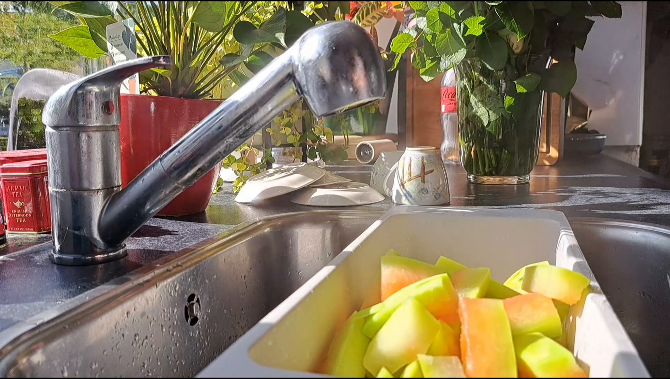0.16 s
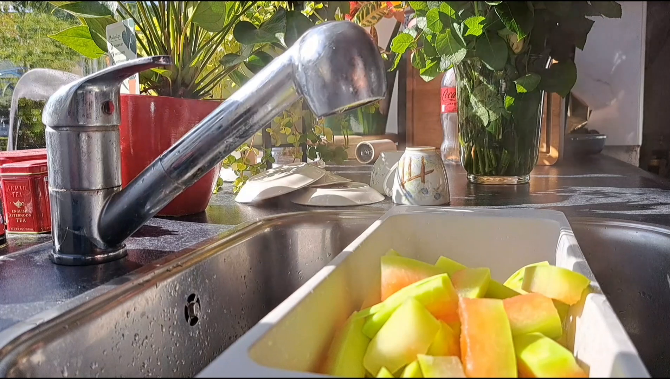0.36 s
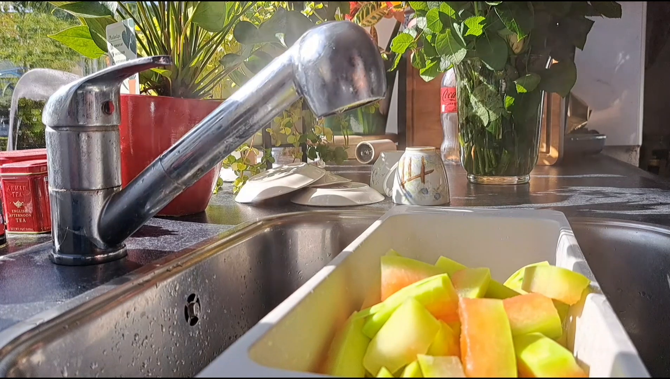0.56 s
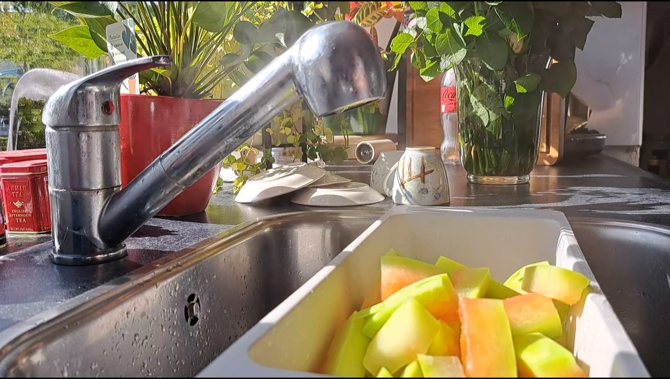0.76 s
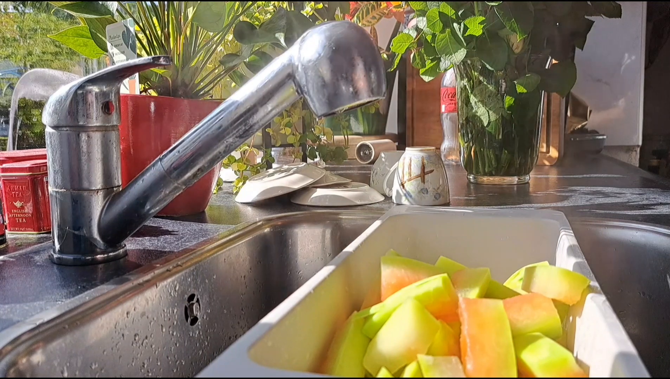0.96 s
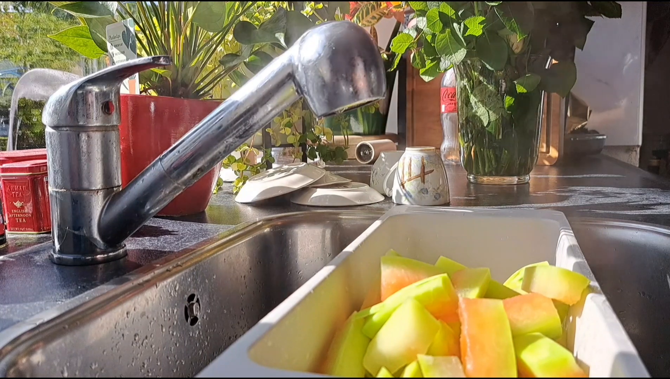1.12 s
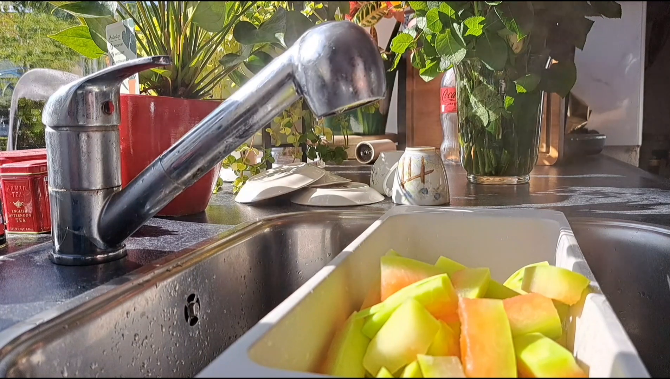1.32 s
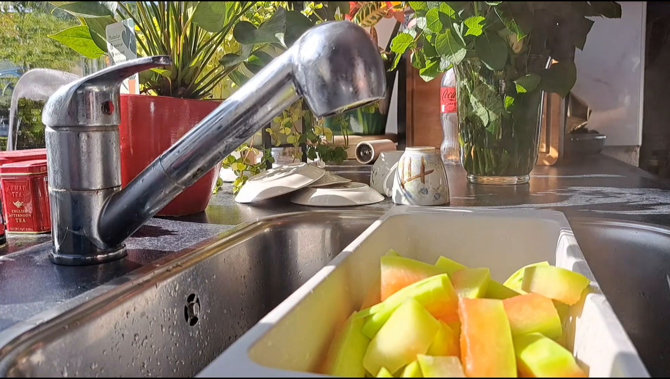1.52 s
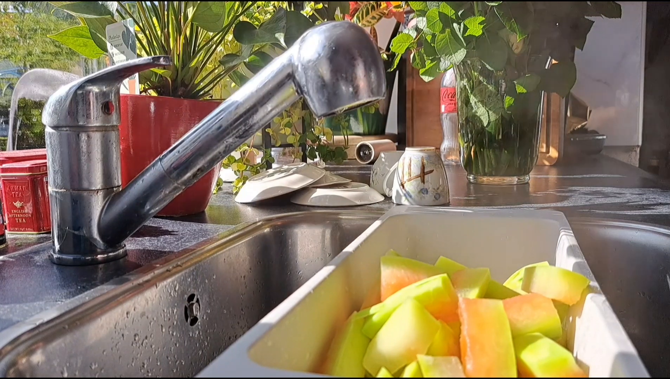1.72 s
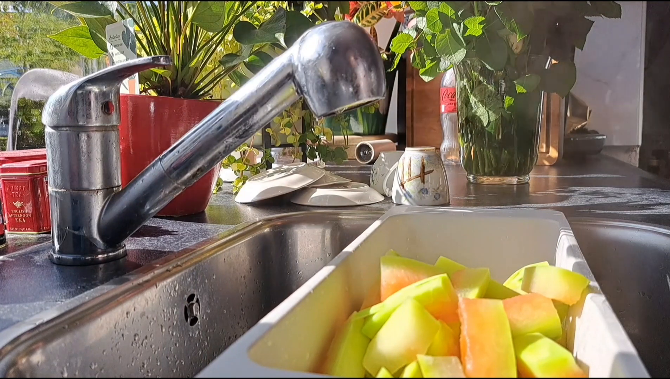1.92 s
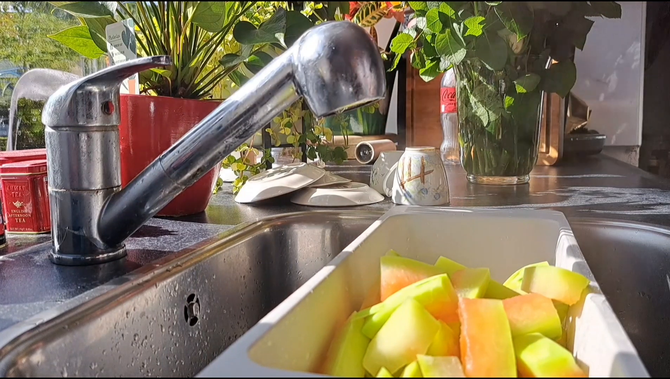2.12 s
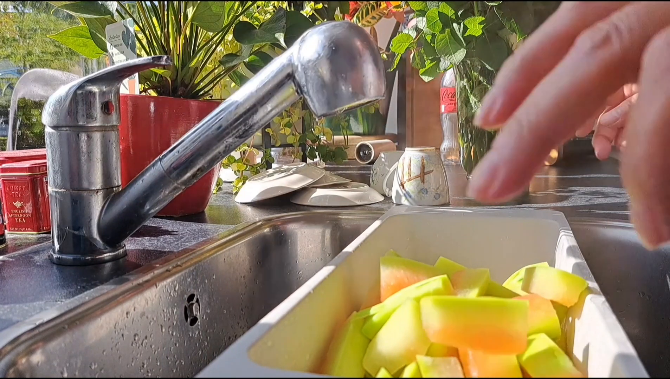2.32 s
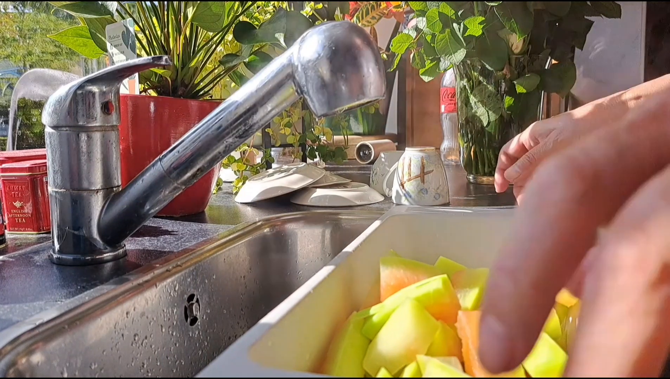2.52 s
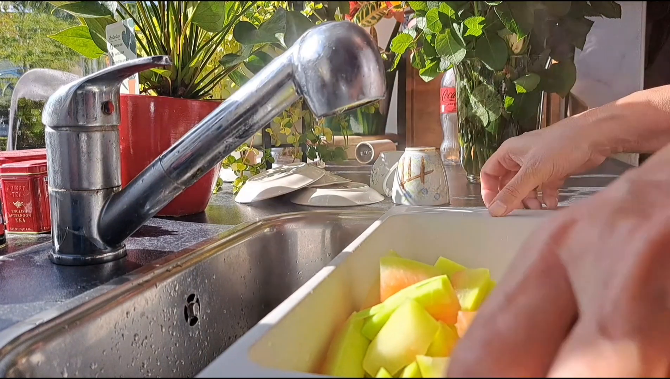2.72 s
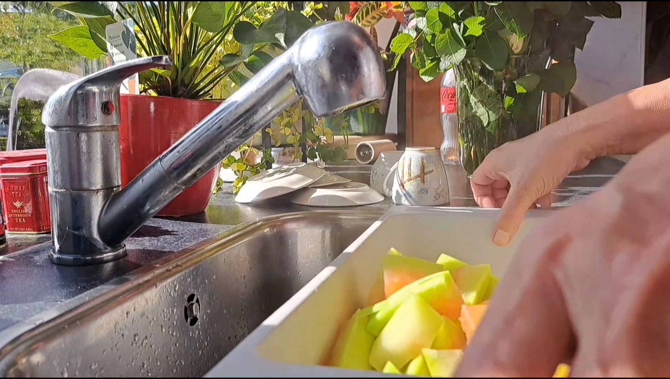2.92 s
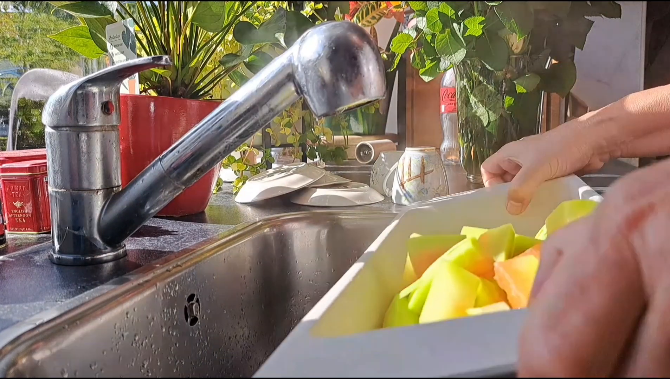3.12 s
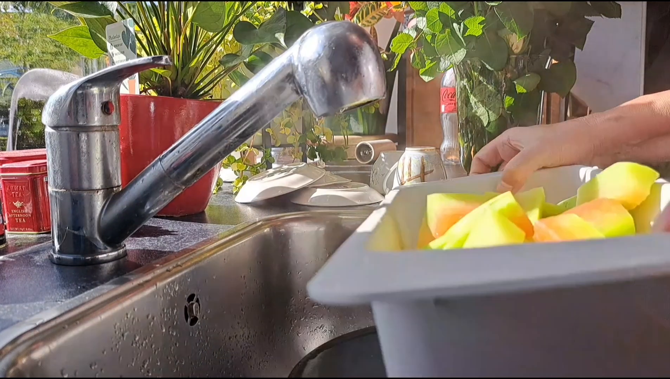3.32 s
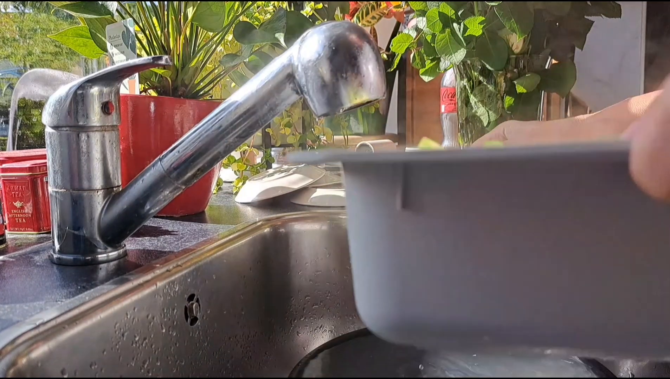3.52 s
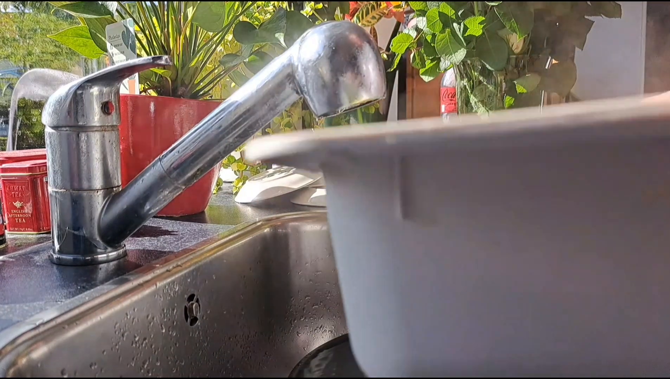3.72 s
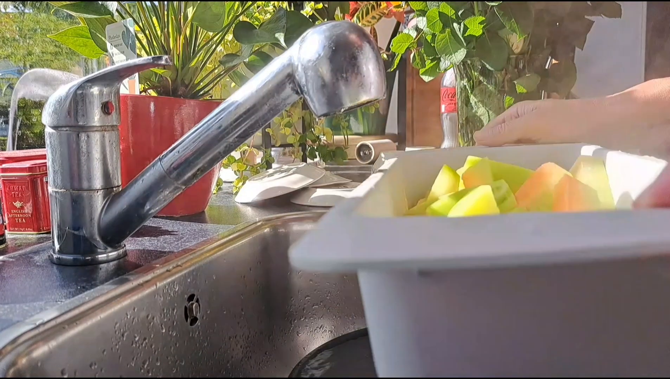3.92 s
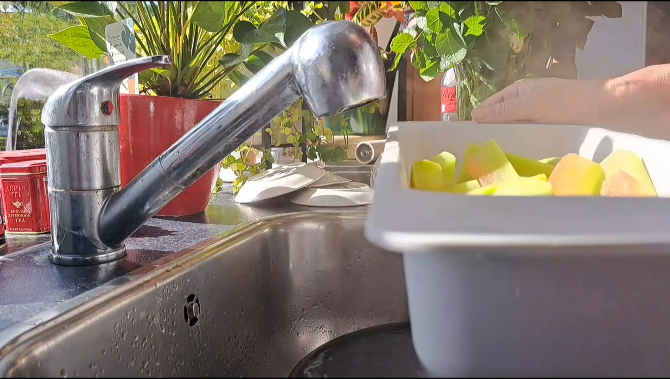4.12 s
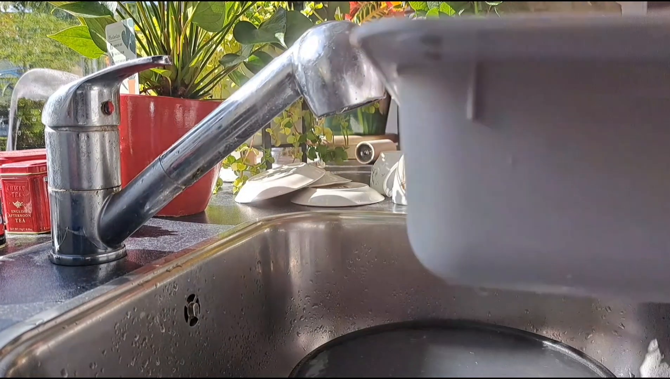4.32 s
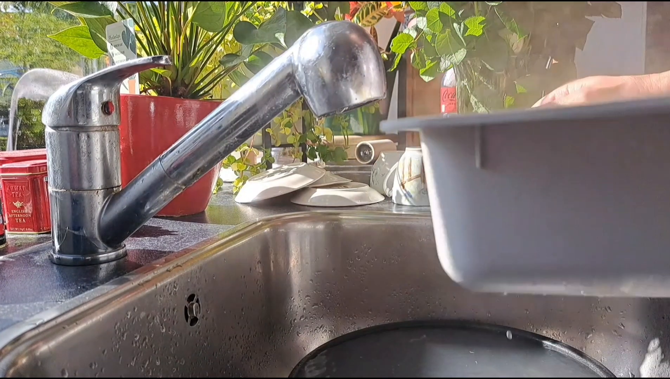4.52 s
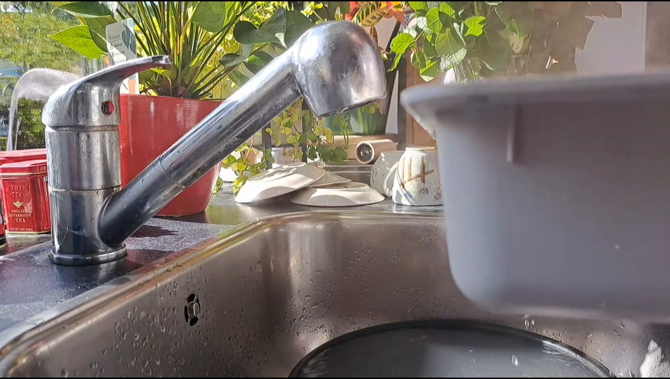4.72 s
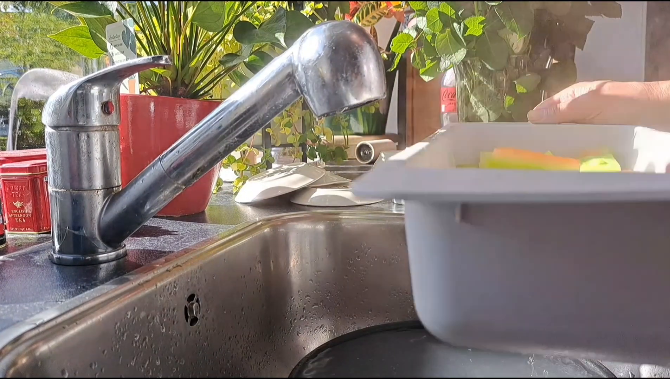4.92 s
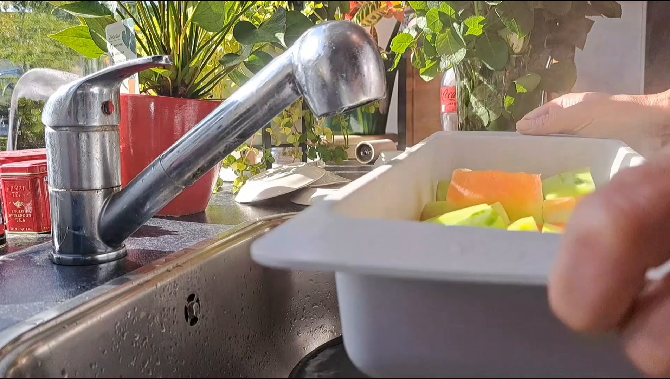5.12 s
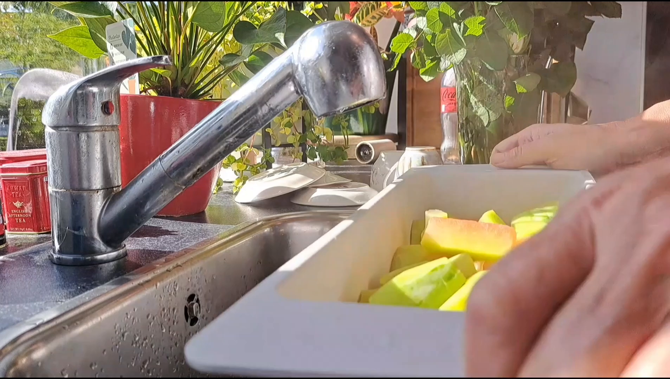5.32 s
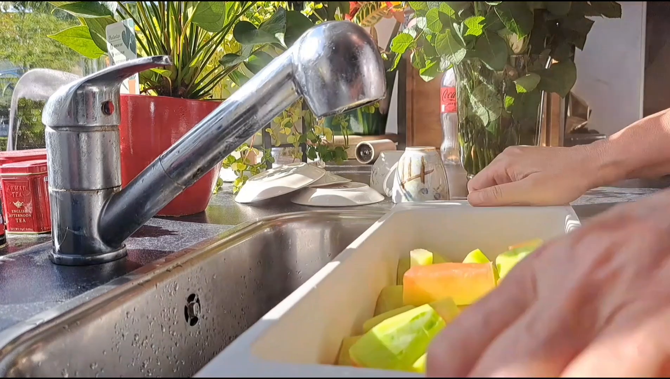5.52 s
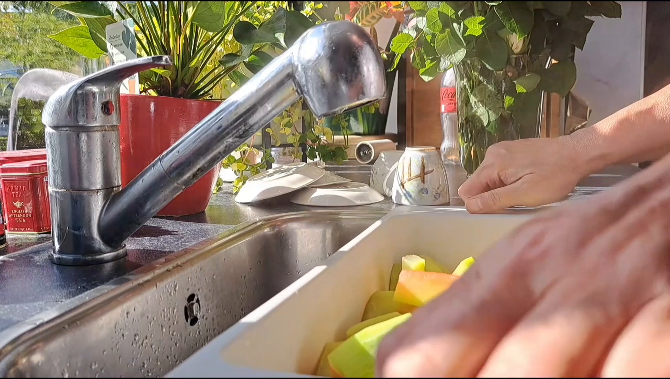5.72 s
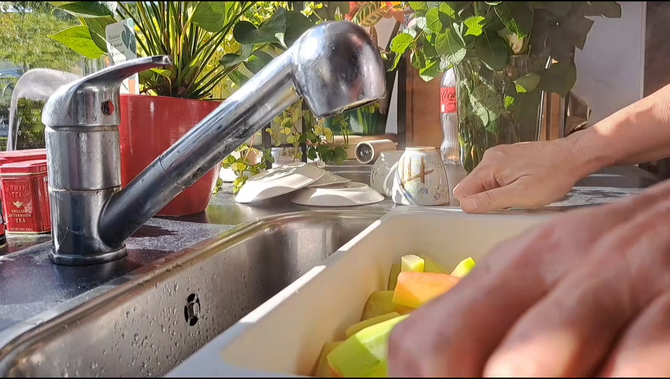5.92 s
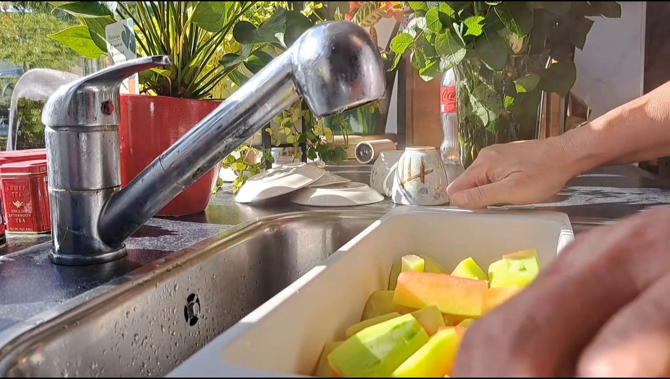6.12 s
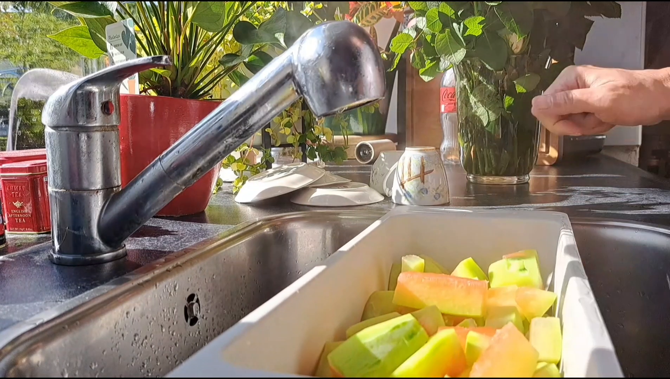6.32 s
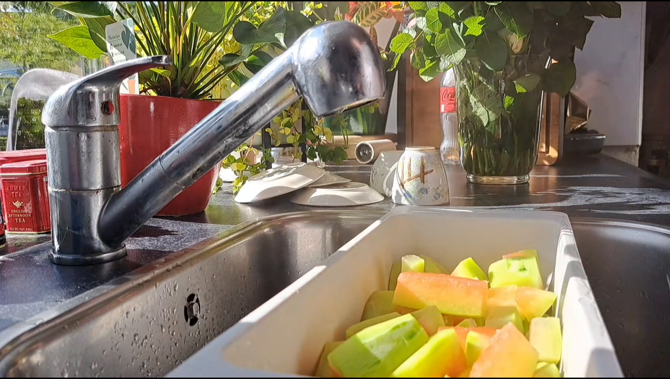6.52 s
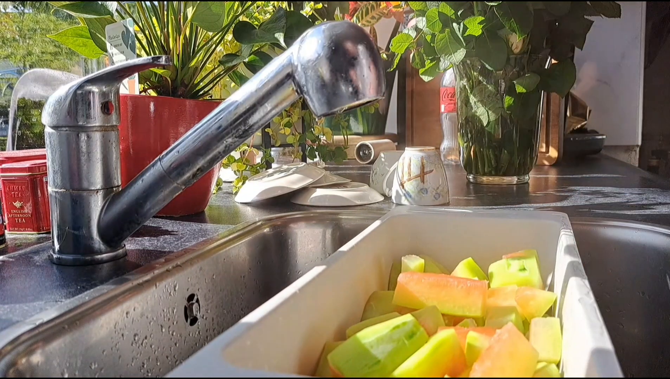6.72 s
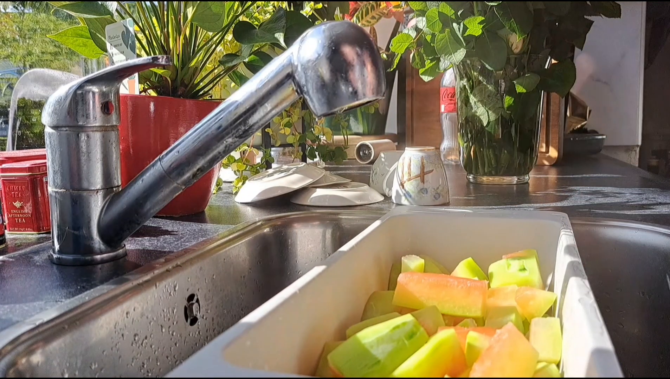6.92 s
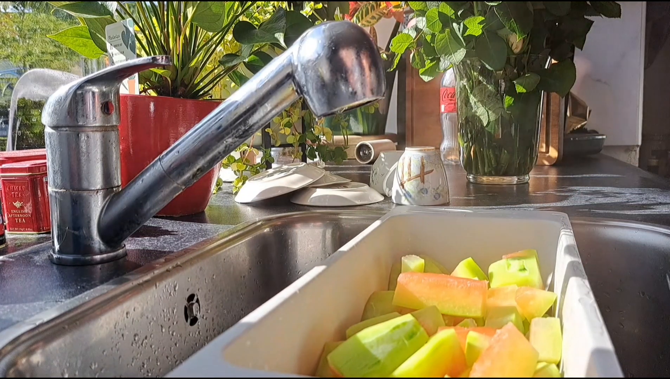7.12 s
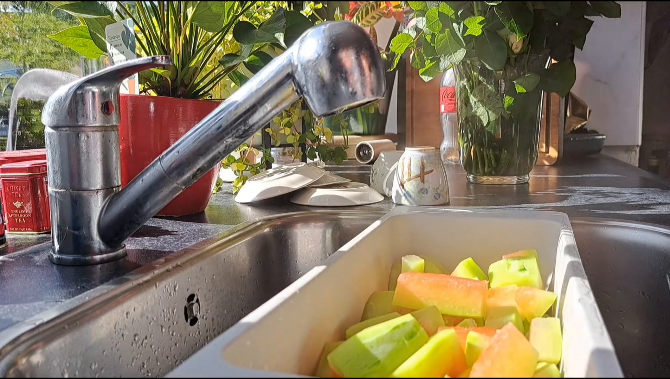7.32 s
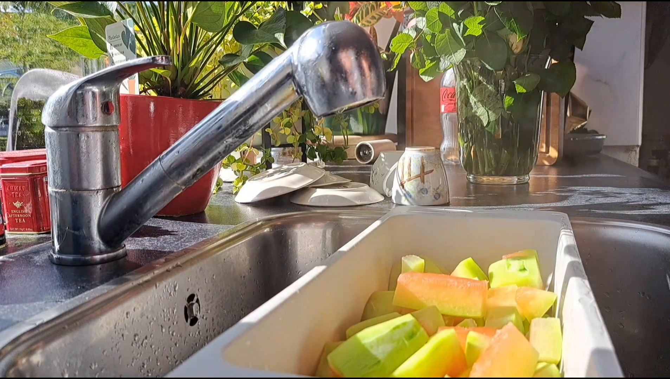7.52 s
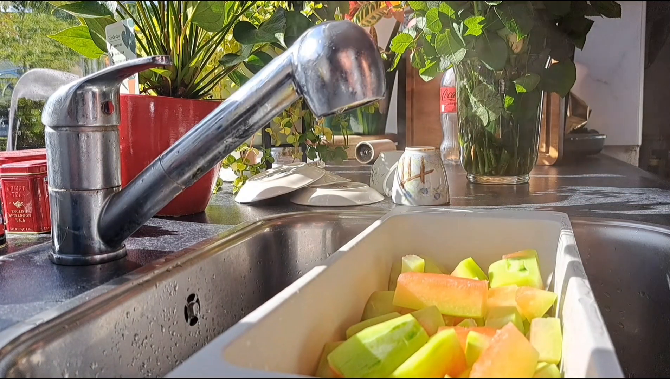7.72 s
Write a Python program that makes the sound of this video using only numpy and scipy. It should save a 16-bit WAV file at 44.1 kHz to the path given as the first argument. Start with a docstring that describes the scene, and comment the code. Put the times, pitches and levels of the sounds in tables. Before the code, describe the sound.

Close stereo pickup at a kitchen sink: soft fan hum first, with faint rubs and a distant dove. Small taps and a sharp click lead to a burst of dull, hollow plastic thuds as wet fruit is tossed in a tub, with scraping and rolling between blows. Lighter knocks follow, then two or three hard contacts as it is set down. The hum remains, with a faint coo outside.

```python
"""A fan hum fills a kitchen throughout, and a dove coos outside early and again near the end.
A plastic tub of cut fruit is lifted out of a steel sink, shaken and set back, close to two microphone ports.
Blows excite damped modes of the tub walls, wet fruit slides as grainy filtered noise, the rim ticks
on the steel as clicks and noise bursts, and the basin answers with a short dense tail."""
import sys
import numpy as np
from scipy import signal
from scipy.fft import rfft, irfft, next_fast_len
from scipy.io import wavfile
from scipy.ndimage import uniform_filter1d

SR = 44100
rng = np.random.default_rng(int(sys.argv[2]) if len(sys.argv) > 2 else 0)


def log_audio(samples):
    """Write samples as a 16-bit WAV file to the path given in sys.argv[1]."""
    # one column per channel
    frames = np.atleast_2d(samples).T
    # limit to full scale, then quantise
    limited = np.clip(frames, -1, 1)
    pcm = np.round(limited * 32767).astype(np.int16)
    wavfile.write(sys.argv[1], SR, pcm)


N = 342152

# Modes of the tub walls. Each row: frequency in Hz, relative level in dB,
# decay time t60 in seconds before damping and panel alter it.
TUB_MODES = [(103, -2, 0.12), (154, -10.5, 0.063), (237.3, -5, 0.14), (277.5, -6, 0.098),
             (326.6, -2.5, 0.096), (369.7, -4.5, 0.094), (433.4, -2.5, 0.08), (453, -8, 0.084),
             (508, -18, 0.098), (569, -2.5, 0.18), (622, -2, 0.16), (700, -8, 0.035), (731, -9.5, 0.21),
             (814, 2, 0.035), (949, 5, 0.06), (1090, -12.5, 0.06), (1250, -2.5, 0.14), (1390, -23, 0.025),
             (1628, -7.5, 0.22), (1810, -11.5, 0.1), (1915, -12.5, 0.11), (2120, -15, 0.16),
             (2200, -17, .08), (2383, -5, 0.11), (2630, -10.5, 0.1), (2954, -9.5, 0.12)]
PORTS_M, LAG_S = 0.14, .00007  # usual port spacing for diffuse sound; delay of events at the left port


def undb(db):
    """Decibels to amplitude gain: 20 dB is a factor of ten."""
    return 10 ** (np.asarray(db) / 20)


def level(x, db):
    """Root-mean-square normalisation: scale a signal to an rms level in dB."""
    return x * undb(db) / np.sqrt(np.mean(x ** 2))


def curve(rows):
    """Linear interpolation in time: each column of a table becomes one value a sample."""
    s, *columns = np.transpose(rows)
    return [np.interp(np.arange(N) / SR, s, c) for c in columns]


def on_log(hz, table):
    """Interpolation of a spectrum table on a log-frequency axis."""
    f, values = np.transpose(table)
    return np.interp(np.log(np.maximum(hz, 1)), np.log(f), values)


def decay(t, t60):
    """Exponential damping: the amplitude falls by 60 dB in t60 seconds."""
    return np.exp(-np.log(1000) * t / t60)


def ring(hz, t60, size=8000):
    """Damped oscillator: a sine under an exponential decay."""
    t = np.arange(size) / SR
    return decay(t, t60) * np.sin(2 * np.pi * hz * t)


def diffuse(gain_of_hz, size=N, ports_m=PORTS_M):
    """Diffuse-field coherence: coloured noise alike at both ports in the bass, unrelated in the treble."""
    n = next_fast_len(size)
    hz = np.arange(n // 2 + 1) * SR / n
    alike = np.sinc(2 * hz * ports_m / 343)  # speed of sound in m/s
    noise = rfft(rng.standard_normal((2, n)))
    mid, side = noise * gain_of_hz(hz) * np.sqrt([1 + alike, 1.001 - alike])
    return irfft(np.array([mid + side, mid - side]), n)[:, :size]


def walk(rate):
    """Low-pass random modulation: levels held 1 / rate s and smoothed twice; spread near 1."""
    k = int(SR / rate)
    held = np.repeat(rng.standard_normal(N // k + 1), k)
    return 1.3 * uniform_filter1d(uniform_filter1d(held, k), k)[:N]


def add(out, s, sound, pan_db):
    """Superposition with level and arrival differences: the left port hears each event a little late."""
    sound = np.broadcast_to(sound, (2, np.shape(sound)[-1]))
    for c in range(2):
        i = int((s + (1 - c) * LAG_S) * SR)
        out[c, i:i + sound.shape[1]] += (sound[c] * undb((.5 - c) * pan_db))[:N - i]


def thumps():
    """Modal excitation by impact: a dent and a rap at the contact, then wall modes weighed anew by each blow."""
    # Fruit or steel striking the tub. Each row: start in seconds, dent peak in dB, contact pitch in Hz,
    # contact t60 in seconds, rap in dB, relative wall ring in dB, struck panel in Hz, left minus right in dB.
    blows = [(.678, -47.5, 880, .03, -10, -8, 950, -8), (2.2276, -27.5, 473, .012, -25, -12.5, 515, 0),
             (2.2453, -38, 715, .009, 0.5, -9, 438, -8), (2.5822, -32.5, 726, .009, -32, -7.5, 560, -1),
             (2.713, -31, 593, 0.01, 1, -9, 447, 2), (2.773, -34.5, 650, 0.0075, 1.5, -1, 462, 3),
             (2.8974, -33.5, 434, .018, -9, -8.5, 487, -3), (2.9747, -36, 945, 0.0081, 5, 1, 890, -4),
             (3.0548, -18, 342, 0.04, -1.5, -7, 350, -3.5), (3.183, -35.5, 450, .015, -9, -12, 474, 2),
             (3.238, -41.5, 401, 0.03, -18, -8, 400, -4), (3.2807, -38.5, 950, .009, 0, -0.5, 1300, 8),
             (3.388, -10, 637, 0.021, -44, -16.5, 333, -5), (3.3925, -15, 420, .03, -46, -16.5, 330, -5),
             (3.4382, -13.5, 580, .009, -8.5, -16.5, 720, -7),
             (3.458, -2.5, 735, 0.009, -28, -18.5, 626, -7), (3.468, -6.5, 617, 0.02, 2, -25.5, 810, -9.5),
             (3.4725, -13.5, 880, .025, -20, -15, 600, -8), (3.513, -31, 650, .009, -6, -19, 650, -11),
             (3.578, -42, 510, 0.01, -13, -3, 576, 9), (3.6484, -17.5, 620, .011, -42, -10, 393, -5),
             (3.773, -25, 430, 0.016, -20, -31, 340, -6), (3.8148, -11, 545, 0.0079, -24, -23, 490, -4),
             (3.8416, -17, 596, 0.0045, -41, -18.5, 420, -2), (3.9526, -26.5, 418, .022, -19, -36, 370, -1),
             (3.9947, 0.5, 620, 0.012, -22, -13.5, 270, -5.5), (4.021, -14.5, 585, .14, -30, -12, 600, -6),
             (4.029, -12.5, 271, 0.11, -40, -15, 270, -3), (4.05, -18.5, 259, 0.11, -42.5, -12, 270, -4),
             (4.075, -24, 300, .14, -30, -8.5, 580, -4), (4.121, -7.5, 960, 0.014, -23, -24, 536, -6.5),
             (4.2934, -43, 550, .009, -17, 1.5, 510, 0), (4.3251, -20, 650, .009, -12.5, -10, 537, -2),
             (4.418, -4.5, 888, 0.012, -13, -24, 634, -6.5), (4.4295, -21.5, 560, 0.03, -4, -14, 600, -7),
             (4.5214, -44, 550, .009, -9, -18, 520, -3), (4.5535, -21, 536, 0.006, -19, -9, 590, -3),
             (4.5789, -32, 680, 0.0082, -13, -6.5, 460, 4), (4.6097, -22, 607, 0.0037, -8.5, -12, 604, -5),
             (4.6175, -29, 600, 0.0097, -7, -12, 600, -3), (4.694, -38, 550, .009, -6, -12, 550, -5),
             (4.7275, -29, 460, 0.012, -27, -17, 606, 1),
             (4.7408, -15, 714, 0.013, -12.5, -16.5, 546, -5.5), (4.778, -24, 426, 0.022, -18, -30, 490, 0),
             (4.8294, -30, 390, .03, -34, -14.5, 470, 0), (4.8391, -29, 620, .009, -13, -11.5, 500, -13),
             (4.852, -27, 447, 0.022, -10, -22, 545, -2), (4.95, -23.5, 694, 0.0038, -17, -16, 438, -5.5),
             (5.068, -40, 724, .009, -10, -27, 360, -4), (5.4415, -21.5, 730, 0.01, -4.5, -3.5, 780, -3.5),
             (5.5635, -27, 780, 0.012, -5, -15, 520, -1), (5.591, -37, 560, .009, 5, -12, 480, -4),
             (5.671, -41, 620, .009, -20, 1, 597, 1), (5.707, -29.5, 720, 0.012, -6, -8, 1090, -5),
             (5.7308, -15, 362, 0.068, 7.5, -4.5, 1370, 1.5), (5.745, -38, 1600, .02, -6, 2, 1300, -4),
             (6.589, -47, 567, .009, -4, -7, 353, -12)]
    # Stiff corner of the tub under a hard blow: two frequencies in Hz.
    rap_hz = [1230, 2450]
    panel_ref_hz, panel_slope = 487, 1.59  # broad, low panels ring longer
    grip_damp_hz = 1800.  # hands deaden the wall modes above this
    flutter_hz, flutter_depth = 60, .9  # wet fruit on the walls makes modes flutter, low ones less
    chatter_share = .18  # share of a blow that loose pieces repeat
    knock_db, knock_t60_s, knock_sharpness = -10, 0.021, 2.3
    mode_pan_spread_db = 8
    size = 8000
    t = np.arange(size) / SR
    out, (hz, mode_db, t60) = np.zeros((2, N)), np.transpose(TUB_MODES)
    chance = rng.standard_normal((len(blows), 3, len(hz)))
    low = 1 / (1 + (hz / 390.0) ** 2)  # the struck panel changes the decay of the low modes most
    bright = signal.butter(1, [1000., 2800.], "band", fs=SR, output="sos")
    for row, (weigh, detune, aim) in zip(blows, chance):
        s, db, contact_hz, contact_t60, rap_db, ring_db, ring_hz, pan_db = row
        stretch = (panel_ref_hz / ring_hz) ** panel_slope

        # the walls answer most near the pitch of the panel that was struck
        reach = (1 + (0.71 * (hz / ring_hz - ring_hz / hz)) ** 2) ** -.7
        gains = undb(mode_db + 1.5 * weigh) * reach * np.sign(detune)
        gains = gains * 2 * undb(ring_db) / np.sqrt(np.sum(gains ** 2))
        mode_t60 = t60 * stretch ** low / (1 + (hz / grip_damp_hz) ** 2)
        modes = ring((hz * (1 + 0.0027 * detune))[:, None], mode_t60[:, None])
        slow_noise = rng.standard_normal((len(hz), int(2 * flutter_hz * size / SR)))
        flutter = signal.resample(slow_noise, size, axis=1)
        depth = flutter_depth * (1 - .8 * low * min(stretch / 2, 1))[:, None]
        fluttering = modes * (1 + depth * flutter) / np.hypot(1, depth)

        # each mode radiates its own way, so the ports weigh it differently
        halves = np.array([[.5], [-.5]])
        aimed = gains * undb(halves * (mode_pan_spread_db * aim + 0.6 * pan_db) * (1.5 - low))
        walls = aimed @ fluttering

        # loose pieces chatter on after the blow and strike the walls again
        strikes = (rng.random(size) < 260 / SR) * rng.standard_normal(size)
        chatter = strikes * np.exp(-t / (0.023 * stretch))
        again = walls + chatter_share * signal.fftconvolve(walls, chatter[None], axes=1)[:, :size]
        walls = again * np.std(modes.T * gains) * np.sqrt(len(hz)) / np.std(again)
        rattle = signal.sosfilt(bright, rng.standard_normal(size))
        rattle = rattle * np.exp(-t / (0.028 * stretch)) * undb(-16.5)

        # wall modes close to the contact pitch speak at once and die fast
        near = undb(mode_db) / (1 + (knock_sharpness * (hz / contact_hz - contact_hz / hz)) ** 2)
        knock = near / np.sqrt(np.sum(near ** 2)) @ ring(hz[:, None], knock_t60_s)
        # the push builds up over a part of a cycle
        push = np.hanning(int(.6 * SR / contact_hz) + 3)
        contact = ring(contact_hz, contact_t60) + undb(knock_db) * knock
        dent = np.convolve(contact, -push / push.sum())[:size]
        rap = ring(rap_hz[0], 0.006) - .5 * ring(rap_hz[1], 0.0041) + rattle
        add(out, s, undb(db) * (dent / np.abs(dent).max() + undb(rap_db) * rap), pan_db)
        # the whole tub rings, so this part is wider and takes a moment to swell
        add(out, s, undb(db) * walls * np.minimum(t / 0.0053, 1), 0.2 * pan_db)
    # a small tub pushes little air in the bass
    return signal.sosfilt(signal.butter(2, 140., "high", fs=SR, output="sos"), out)


def tumble(rate=110, scatter_db=5.0, damp=.45, soft_hz=650.):
    """Random impact excitation: many small soft bumps (rate per second) drive the damped wall modes."""
    # Fruit rolling about in the tub. Each row: time in seconds, level in dB.
    rolling = [(2.56, -53), (2.62, -52), (2.7, -46.5), (2.9, -51.5), (3.2, -51.5), (3.42, -63),
               (3.6, -39.5), (4.1, -48), (4.4, -48.5), (4.78, -40.5), (4.95, -64), (5.35, -63.5),
               (5.66, -48), (5.76, -52), (5.95, -61)]
    sizes_db = scatter_db * np.minimum(rng.exponential(size=(4, N)), 2.5)
    bumps = (rng.random((4, N)) < rate / 4 / SR) * undb(sizes_db)
    hz, mode_db, t60 = np.transpose(TUB_MODES)[:, :, None]
    # soft fruit hardly drives the high modes
    drive = undb(mode_db) / (1 + (hz / soft_hz) ** 3) * hz / (hz + 250)
    signs = np.sign(rng.standard_normal((4, len(hz))))
    spots = signs @ (drive * ring(hz, damp * t60))
    rolls = signal.oaconvolve(bumps, spots, axes=1)[:, :N]
    db, = curve([(rolling[0][0] - .1, -110)] + list(rolling) + [(rolling[-1][0] + .1, -110)])
    # each of the four wall spots reaches the two ports unequally
    spot_gains = np.array([[.5, 0.36, 0.81, 0.41], [1.2, 0.93, 0.68, 1]])
    return level(spot_gains @ rolls, 0) * undb(db)


def slide():
    """Stick-slip friction: dense wet micro-slips make a hiss and a duller scrape, both grainy."""
    # Hands, cloth and wet fruit sliding. Each row: loudest time in seconds, swell in seconds,
    # fade in seconds, hiss level in dB, dull scrape level in dB.
    strokes = [(.69, 0.02, 0.17, -87, -64), (1.4, 0.091, 0.17, -62.5, -66), (1.6, 0.14, 0.082, -72, -81),
               (2.061, .08, 0.47, -69.5, -69), (2.19, 0.057, 0.22, -56, -55), (2.24, 0.12, 0.13, -63, -61),
               (2.61, 0.035, 1, -64, -52), (2.92, 0.31, 0.16, -64, -52), (3.09, 0.28, 0.88, -60.5, -49.5),
               (3.43, 0.043, 0.027, -48.5, -45), (3.61, 0.13, .17, -50, -47),
               (3.9, 0.054, 0.56, -58.5, -52.5), (4.028, 0.033, 0.046, -43, -39),
               (4.113, 0.06, 0.075, -44, -38), (4.43, 0.59, 0.077, -58, -49), (4.56, 0.065, 0.11, -53, -68),
               (4.62, 0.19, 0.069, -55.5, -46.5), (4.73, 0.1, 0.12, -53.5, -56),
               (4.851, 0.058, 0.19, -61, -49), (5.14, 0.15, 0.23, -69.5, -85.5),
               (5.42, 0.18, 0.025, -65.5, -76), (5.48, 0.034, 0.13, -55, -50.5),
               (5.6, 0.11, 0.093, -54, -52), (5.757, 0.065, 0.055, -42, -39), (5.84, .1, 0.14, -63.5, -52),
               (6.069, 0.19, 0.21, -65.5, -57.5), (6.59, 0.027, 0.083, -71, -63)]
    # Hiss spectrum. Each row: frequency in Hz, relative level in dB per Hz.
    hiss_tone = [(1180, -18), (2000, -1.5), (3010, -7.5), (7510, -8), (8780, -17.5), (9490, -16),
                 (13100, -12.5), (15200, -21), (16000, -28.5)]
    # Scrape spectrum. Each row: frequency in Hz, relative level in dB per Hz.
    scrape_tone = [(600, 0), (900, -6.5), (1500, -6), (2400, -12.5), (3200, -23), (4500, -37.5)]
    span_db = 20  # swell and fade are the times to rise and fall by this much
    step = 44  # samples between envelope values
    s, swell_s, fade_s, hiss_db, scrape_db = np.transpose(strokes)
    late = np.arange(0, N, step)[:, None] / SR - s
    power = undb(-2 * span_db * np.maximum(late / fade_s, -late / swell_s))

    def gain(db):
        """Energy addition: the powers of all strokes sum."""
        return np.repeat(np.sqrt(power @ undb(2 * db)), step)[:N]

    hiss = diffuse(lambda hz: undb(on_log(hz, hiss_tone))) * undb(1.14 * walk(120))
    # the colour of the scrape keeps shifting: each half octave catches and slips alone
    scrape = 0
    for centre in 500 * 2 ** np.arange(0, 3.5, .5):
        band = diffuse(lambda hz: undb(on_log(hz, scrape_tone) - 13 * np.log2((hz + 1) / centre) ** 2 * 4.3),
                       ports_m=0.1)
        scrape = scrape + band * undb(3.5 * walk(25))
    scrape = scrape * undb(3.0 * walk(90))
    to_right = undb(np.array([[-1.5], [1.5]]))
    return (level(hiss, 0) * gain(hiss_db) + level(scrape, 0) * gain(scrape_db)) * to_right


def ticks():
    """Impulsive hard contact: a sharp click and a brief bright noise burst with a wet sizzle after it."""
    # Hard ticks of rim, nail or drop. Each row: start in seconds, level in dB, colour in Hz,
    # left minus right in dB, sizzle relative to the burst in dB.
    hard_ticks = [(1.998, -53, 12900, 3, 4), (2.6, -41, 2600, 1, -7), (2.6946, -34, 4600, 5, -9),
                  (2.714, -41.5, 2580, -5, 1), (2.7735, -41, 2610, -4, -9),
                  (2.9731, -10.5, 7200, -6.5, -12), (3.0536, -36.5, 2430, -1, 9),
                  (3.2817, -45.5, 2920, 1, 0.5), (3.386, -41.5, 3490, -4.5, -3),
                  (3.468, -8.5, 2460, 5.5, -24), (3.9937, -25, 3330, -0.5, 3), (4.121, -35, 7350, 0, -16),
                  (4.417, -25.5, 2920, -4.5, -23), (4.69, -45, 7060, -5, -1.5),
                  (5.4413, -18.5, 6200, -2, -3), (5.5616, -27, 3120, -1, -7.5), (5.589, -32, 2800, 1, -8),
                  (5.7085, -36, 2730, 4, 0), (5.7265, -23, 9000, 5, -14), (5.7299, -11.5, 6900, -4, -10.5)]
    tick_t60_s, sizzle_t60_s, sharpness = 0.0052, 0.079, 1
    click_cycles, click_db = 1.8, 7.5  # click decay in cycles; click above the row's level
    out, t = np.zeros((2, N)), np.arange(6000) / SR
    for s, db, centre_hz, pan_db, sizzle_db in hard_ticks:
        def colour(hz):
            """Resonance: a broad peak at the tick's colour, with weak bass and a steep top."""
            peak = 1 / np.sqrt(1 + (sharpness * (hz / centre_hz - centre_hz / (hz + 1))) ** 2)
            return hz / (hz + 900) * peak / np.hypot(1, (hz / centre_hz / 2.32) ** 3)

        burst = diffuse(colour, size=len(t), ports_m=0.16)
        click = undb(db + click_db) * ring(centre_hz, click_cycles / centre_hz, size=len(t))
        fade = decay(t, tick_t60_s) + undb(sizzle_db) * decay(t, sizzle_t60_s)
        # noise peaks stand nearly three times above its mean level
        add(out, s, click + level(burst, db) / np.e * fade, pan_db)
    return out


def plinks():
    """Free vibration of steel: short damped sines that swell in for a few milliseconds."""
    # Short plinks of steel. Each row: start in seconds, frequency in Hz, level in dB, t60 in seconds.
    steel_plinks = [(1.28, 1700, -65, 0.24), (1.37, 1710, -63, .1), (2.974, 1780, -37, .05),
                    (2.974, 3300, -34, .04), (2.974, 4600, -37, .04), (3.277, 930, -45, 0.064),
                    (3.28, 2390, -52, 0.15), (3.282, 2834, -48, 0.091), (5.735, 1557, -37, 0.22),
                    (5.732, 1120, -34, 0.1), (5.735, 1645, -39.5, 0.25), (5.783, 1610, -39, .09),
                    (5.762, 369, -29, 0.13), (6.11, 996, -52, 0.11), (6.412, 1240, -53.5, 0.082)]
    out, onset = np.zeros((2, N)), np.minimum(np.arange(8000) / SR / 0.0058, 1)
    for s, hz, db, t60 in steel_plinks:
        add(out, s, undb(db) * ring(hz, t60) * onset, -1.5)
    return out


def ports(x):
    """Diffraction at the casing: treble is coloured differently at each port; long waves reach both alike."""
    # Colour of near sounds. Each row: frequency in Hz, left minus right in dB.
    port_colour = [(1500, 0.5), (4000, -2), (7000, -3), (8500, 1), (12000, 10), (16000, 0)]
    alike_below_hz = 230
    n = next_fast_len(N)
    hz, sound = np.arange(n // 2 + 1) * SR / n, rfft(x, n)
    mid, tilt_db = sound.mean(axis=0), on_log(hz, port_colour)
    sound = mid + (sound - mid) * hz ** 2 / (hz ** 2 + alike_below_hz ** 2)
    return irfft(sound * undb(np.array([tilt_db, -tilt_db]) / 2), n)[:, :N]


def basin(x, wet_db=-13):
    """Reverberation by convolution: the steel bowl and the kitchen answer with a short dense tail."""
    # Decay of the tail. Each row: frequency in Hz, t60 in seconds.
    basin_t60 = [(300, 0.36), (1300, 0.19), (3500, 0.33), (9000, 0.25), (15000, 0.14)]
    t, tail = np.arange(13000) / SR, 0
    for hz in 150 * 2. ** np.arange(0, 7, .5):
        band = diffuse(lambda f: np.exp(-(np.log2(np.maximum(f, 1) / hz) / .3) ** 2), size=len(t))
        tail = tail + band * decay(t, on_log(hz, basin_t60))
    tail = tail * np.minimum(t / 0.004, 1)
    tail = tail * undb(wet_db) / np.sqrt(np.sum(tail ** 2) / 2)
    return x + signal.fftconvolve(x.mean(axis=0, keepdims=True), tail, axes=1)[:, :N]


def rumble():
    """Band-limited noise: the bass swells unevenly while the hands work at the sink edge."""
    centre_hz, rms_db, from_s, until_s = 68.9, -47.5, 2.46, 4.2  # rms level before the swell
    hump = np.interp(np.arange(N) / SR, [from_s, until_s], [0, np.pi])
    low = diffuse(lambda hz: 1 / (1 + (0.59 * (hz / centre_hz - centre_hz / (hz + 1))) ** 2))
    return level(low * undb(3.2 * walk(6.2)), rms_db) * np.sqrt(np.abs(np.sin(hump)))


def dove():
    """Frequency and amplitude modulation: soft sine notes that swell, sag in pitch and fade."""
    # Dove notes. Each row: start in seconds, length in seconds, pitch in Hz, level in dB.
    coos = [(1.21, 0.26, 536.6, -47.5), (1.48, 0.16, 618, -60.5), (5.96, 0.29, 541, -46),
            (7.11, 0.21, 537, -57.5)]
    out, waver, wobble = np.zeros((2, N)), walk(23.36), walk(70)
    for s, length, hz, db in coos:
        part = np.arange(int(length * SR)) / SR / length
        note = slice(int(s * SR), int(s * SR) + len(part))
        swell = np.sin(np.pi * part ** .7) ** 1.4 * undb(2.5 * waver[note])
        pitch = hz * (1 - 0.08 * (part - .45) ** 2 - 0.012 * part + 0.006 * wobble[note])
        add(out, s, undb(db) * swell * np.sin(2 * np.pi * np.cumsum(pitch) / SR), -1.5)
    return out


def kitchen():
    """Tonal lines over broadband noise: a wavering fan hum above air whose bands flicker alone."""
    # Fan hum. Each row: frequency in Hz, width in Hz, level in dB before it wavers.
    hum = [(52, 15, -55.5), (113, 17, -48.5), (227.6, 16, -54.5), (344, 24, -60.5), (429.6, 31, -67),
           (1090, 4.5, -75.5)]
    # Spectrum of the air noise. Each row: frequency in Hz, relative level in dB per Hz.
    air_tone = [(12, -52), (20, -16), (117, -4), (165, -14), (224, -8), (281, -16), (351, -11), (506, -21),
                (670, -20), (1350, -34), (2200, -38.5), (3330, -49.5), (5800, -48.5), (7510, -46),
                (9410, -56.5), (12800, -50), (16500, -64)]
    air_db, left_db, left_lag_s = -50, -.8, .0003
    dip_db, dip_from_s, dip_lowest_s, dip_rising_s, dip_over_s = -5.5, 3.7, 5.06, 5.33, 5.57
    air, swell = 0, walk(0.94)
    for centre in 25 * 2. ** np.arange(0, 10):
        def band_gain(hz):
            """Overlapping octave bands: a cosine share of the air spectrum."""
            octaves = np.log2(np.maximum(hz, 1) / centre)
            return undb(on_log(hz, air_tone)) * np.cos(np.pi / 2 * np.clip(octaves, -1, 1))

        air = air + diffuse(band_gain) * undb(.7 * swell + .9 * walk(4))
    out = level(air, air_db)
    for centre_hz, width_hz, db in hum:
        rough = diffuse(lambda hz: 1 / (1 + (2 * (hz - centre_hz) / width_hz) ** 2))
        steady = np.sin(2 * np.pi * np.cumsum(centre_hz * (1 + 0.00605 * walk(3))) / SR)
        out = out + level(level(rough, 0) + 1.1 * steady, db) * undb(.8 * walk(5))
    # the fan stands to the right
    out = np.array([np.roll(out[0], int(left_lag_s * SR)) * undb(left_db), out[1]])
    # the background sinks around the loudest blows and recovers
    dip, = curve([(dip_from_s, 0), (dip_lowest_s, dip_db), (dip_rising_s, 0.92 * dip_db), (dip_over_s, 0)])
    return out * undb(dip)


def scene():
    """Superposition: handling sounds in the basin and a dove outside, over the kitchen."""
    near = ports(thumps() + ticks())
    return basin(near + tumble() + plinks() + dove()) + slide() + rumble() + kitchen()


def record(dry):
    """Saturation and band limiting: rounds the loudest peaks, cuts the deepest bass and the top."""
    top_hz = 16500
    dry = np.tanh(dry / .97) * .97
    dry = signal.sosfilt(signal.butter(2, 24., "high", fs=SR, output="sos"), dry)
    return signal.sosfilt(signal.ellip(10, .2, 80, top_hz, fs=SR, output="sos"), dry)


dry = scene()
out = record(dry)
log_audio(out)
```